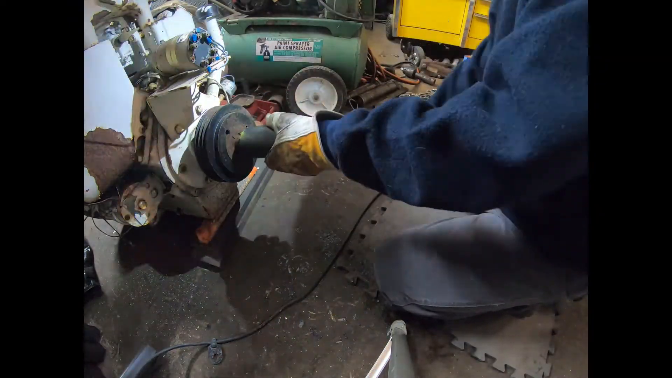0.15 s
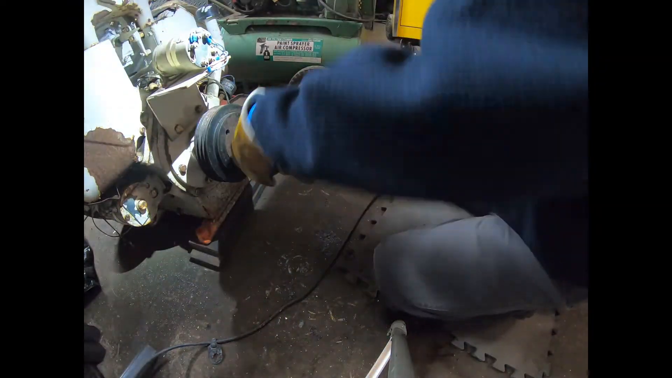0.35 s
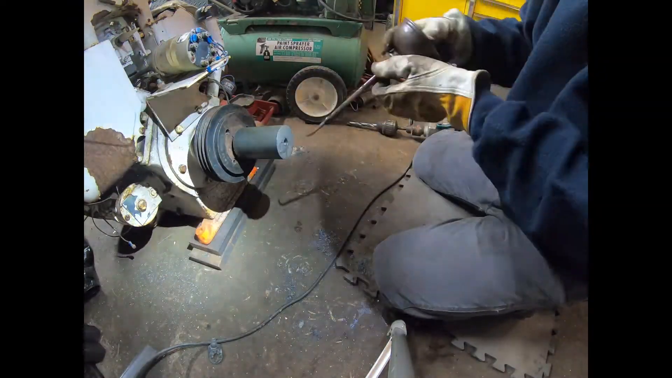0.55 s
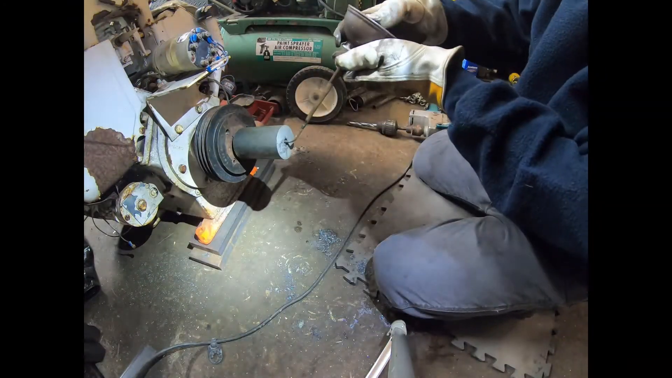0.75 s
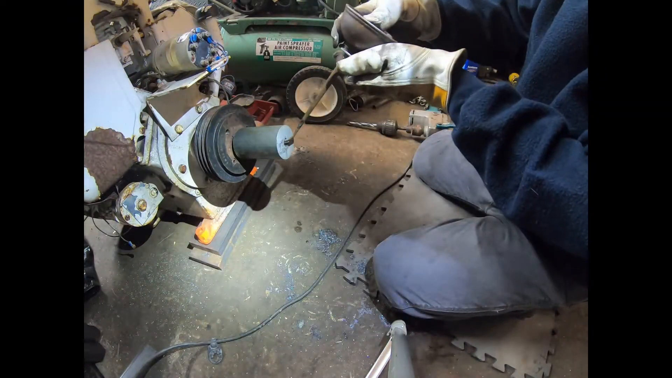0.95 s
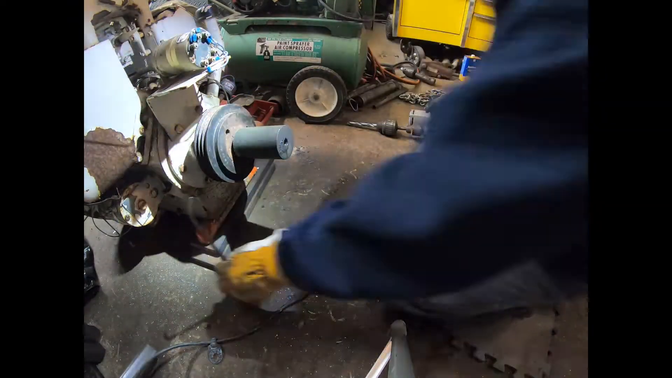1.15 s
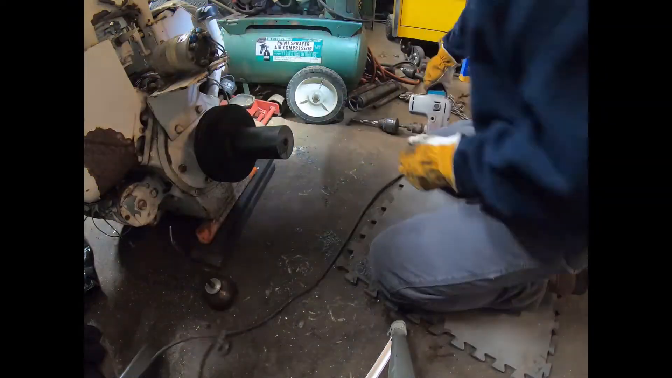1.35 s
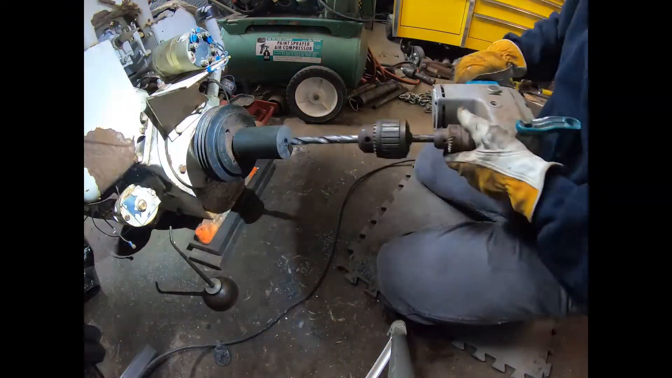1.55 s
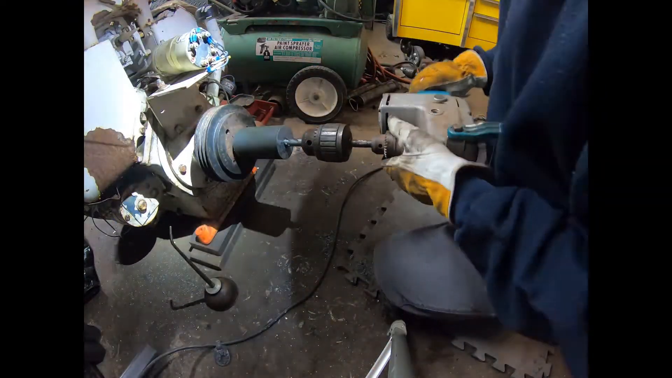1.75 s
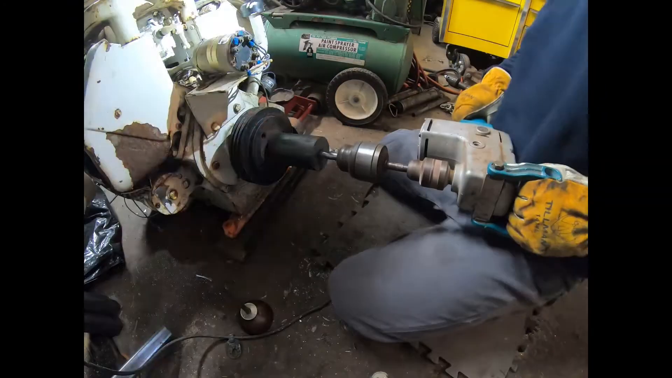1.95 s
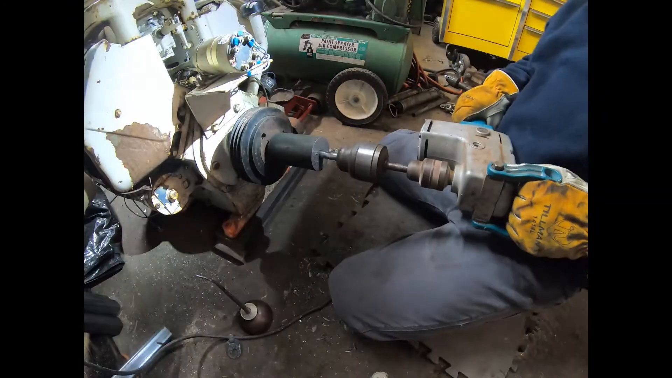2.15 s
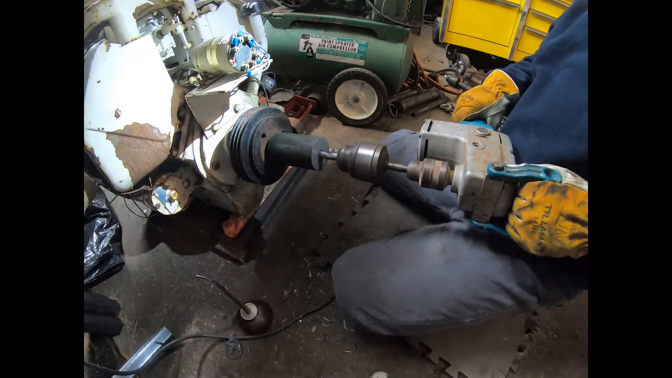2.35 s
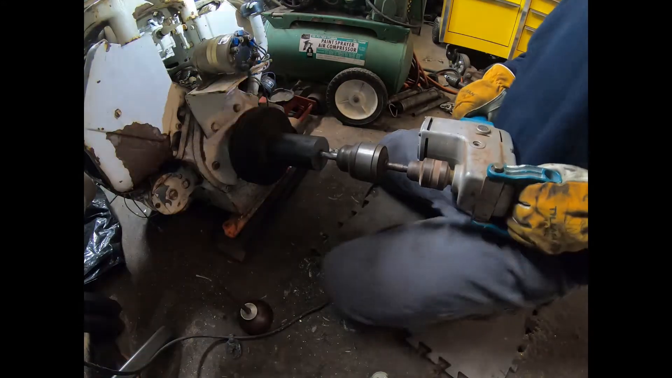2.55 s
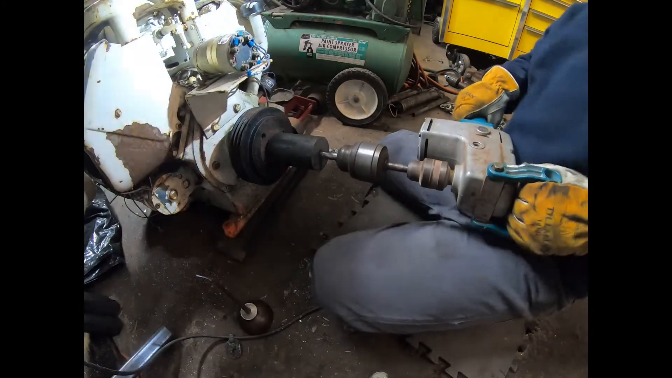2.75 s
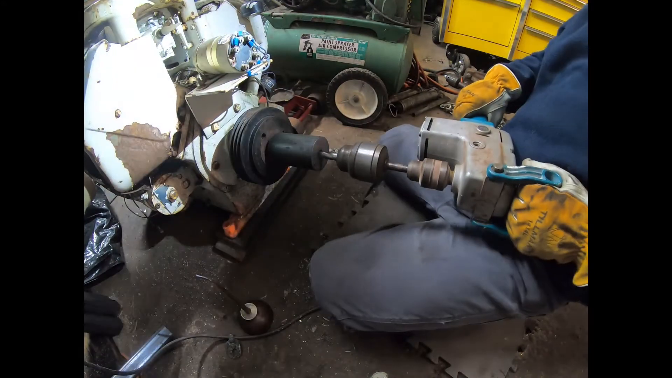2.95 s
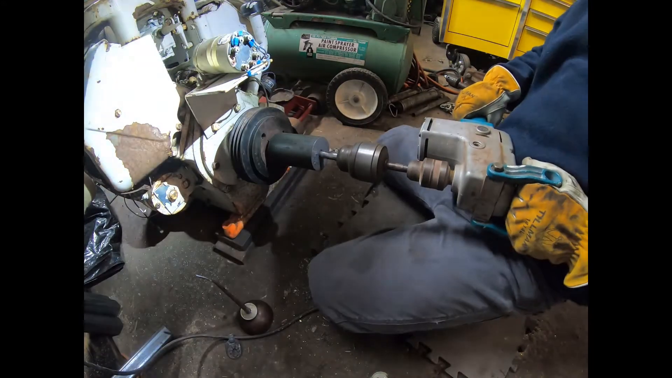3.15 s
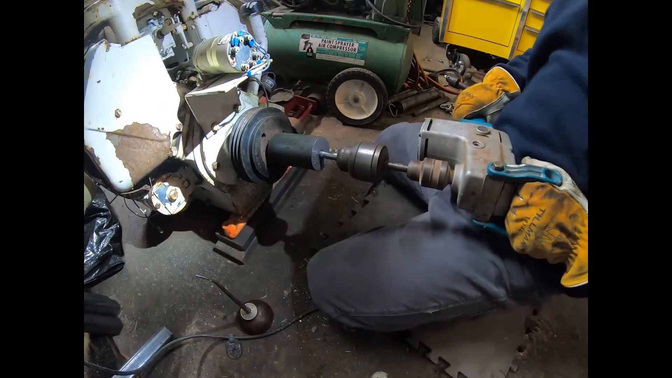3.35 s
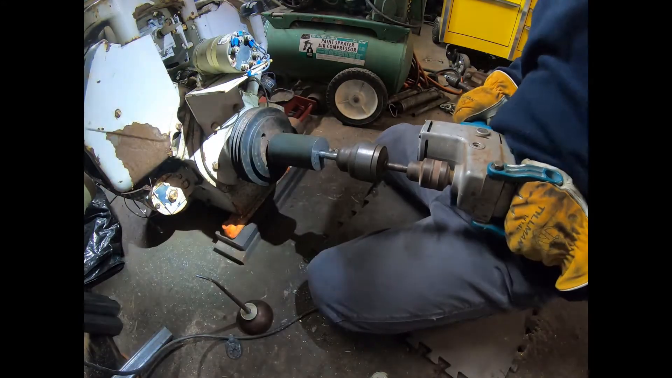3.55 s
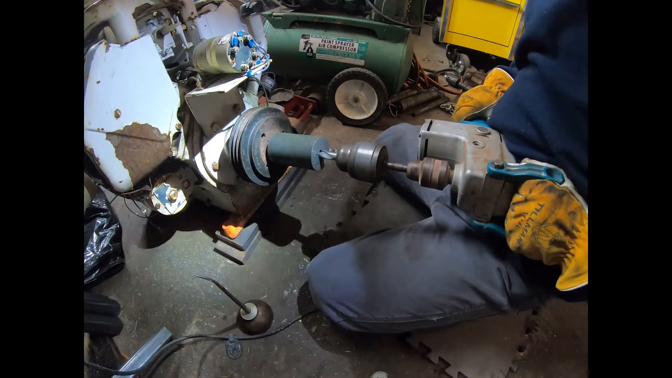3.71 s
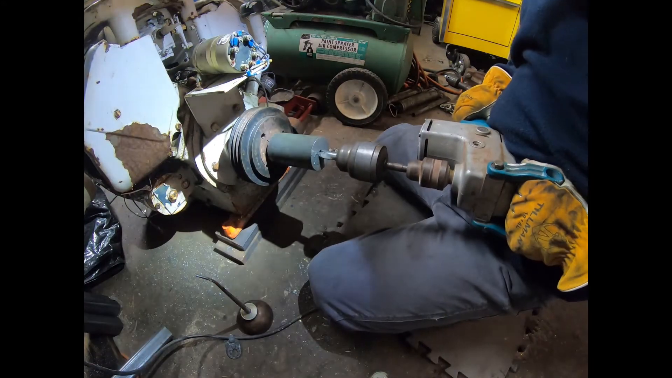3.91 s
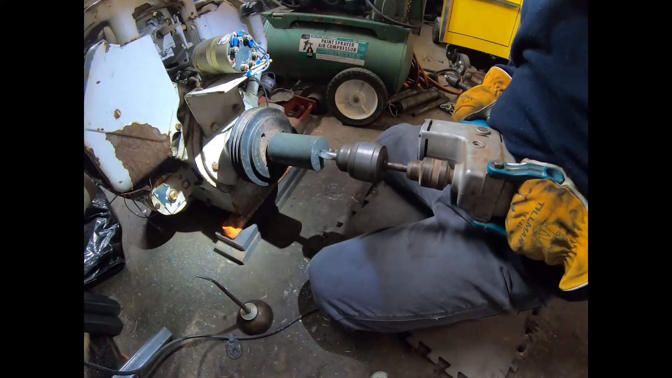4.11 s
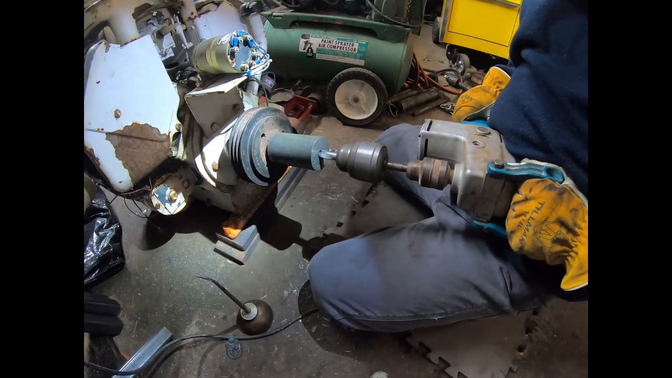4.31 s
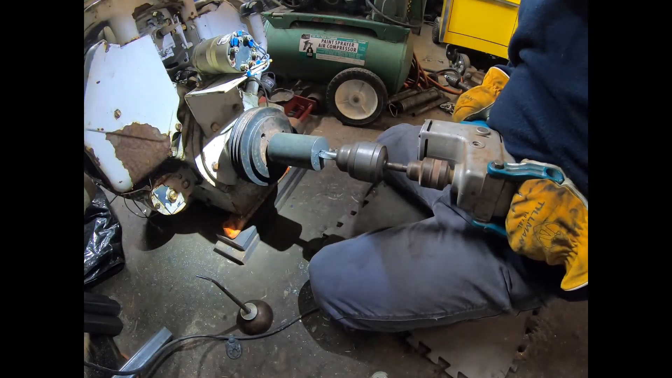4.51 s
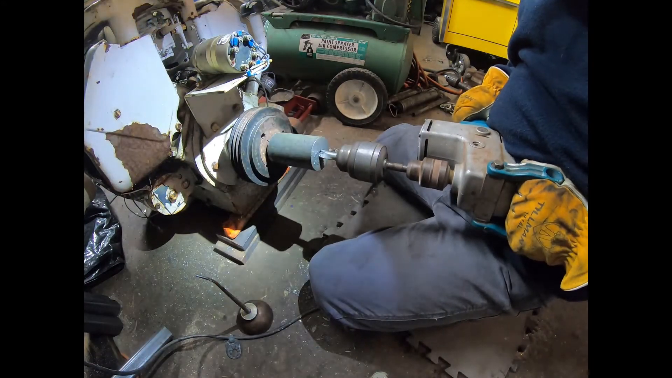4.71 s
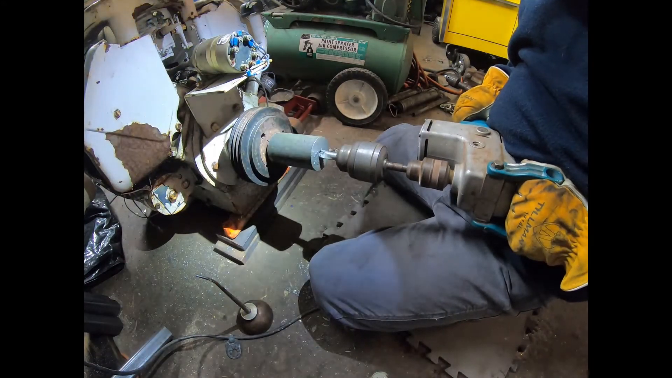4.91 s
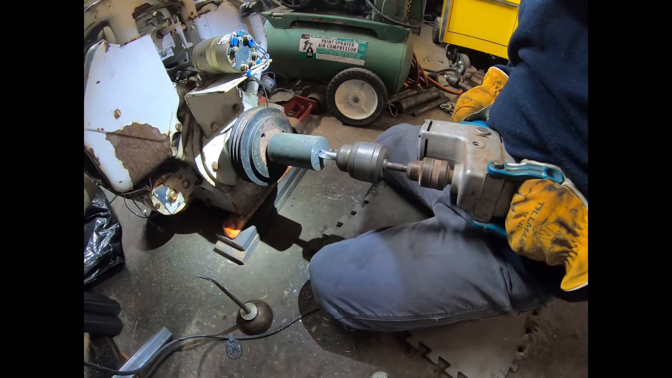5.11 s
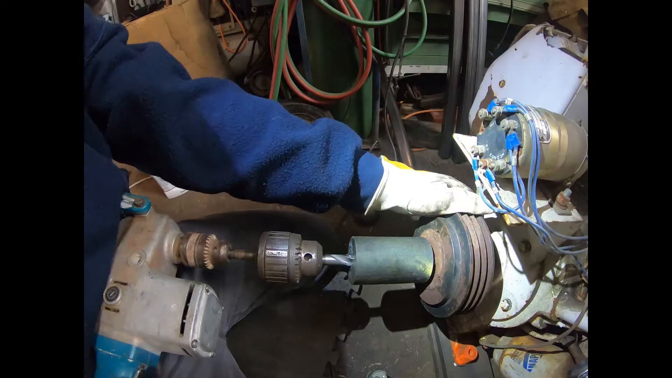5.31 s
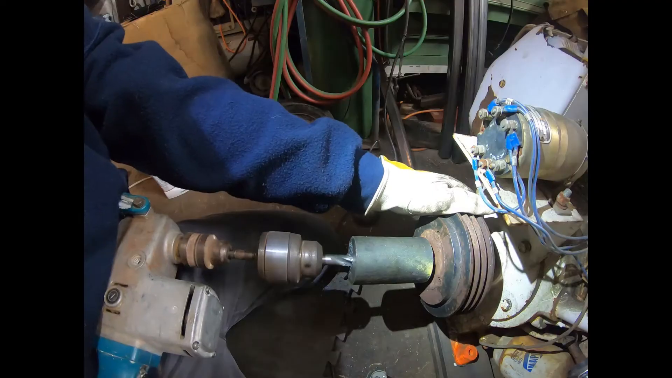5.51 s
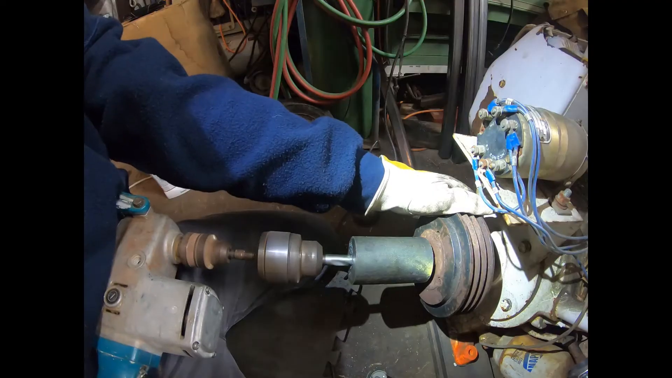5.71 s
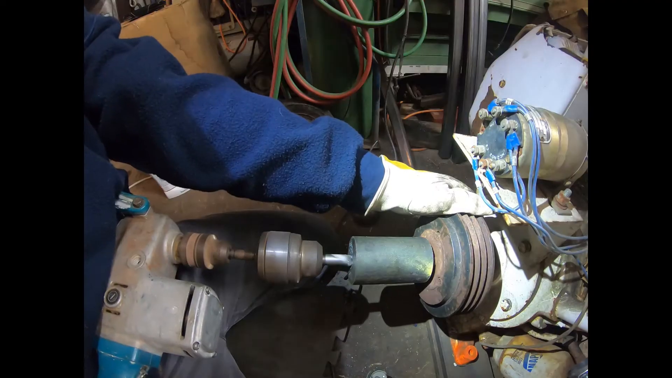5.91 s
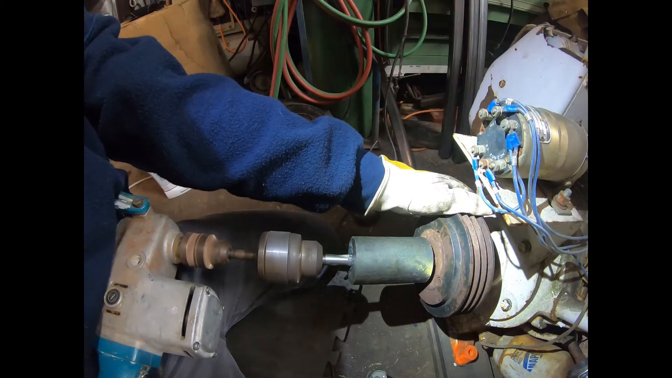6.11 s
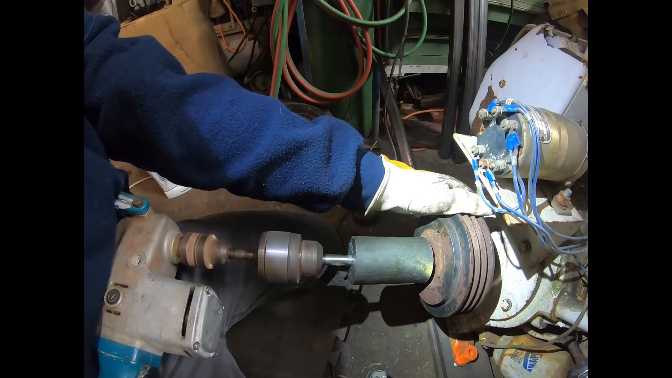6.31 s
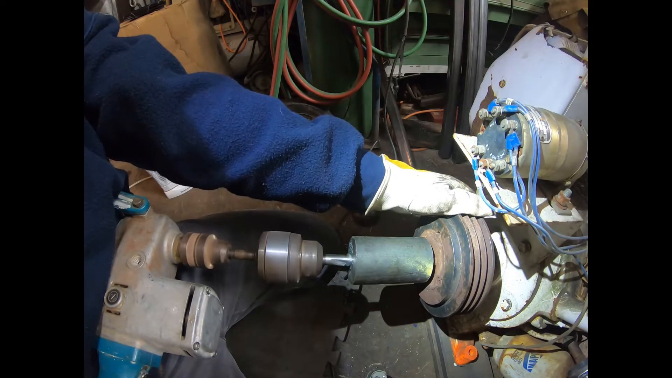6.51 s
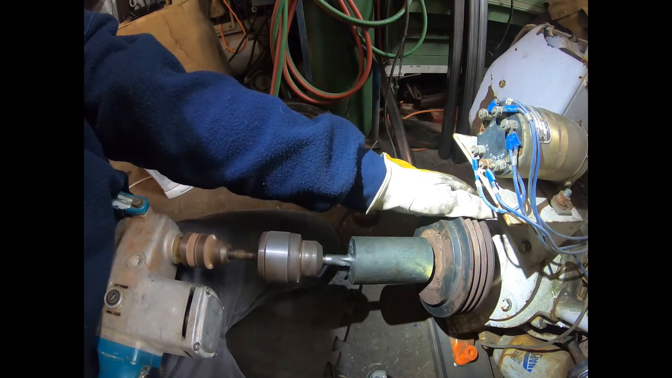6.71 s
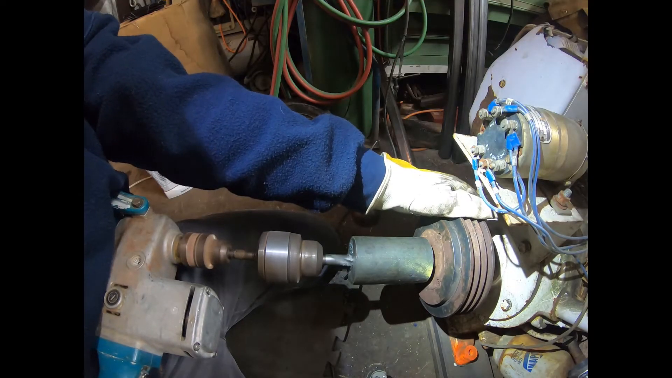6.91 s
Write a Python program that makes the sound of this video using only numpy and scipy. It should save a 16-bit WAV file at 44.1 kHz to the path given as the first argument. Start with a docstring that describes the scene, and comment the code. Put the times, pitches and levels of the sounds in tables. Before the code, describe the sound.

A quiet workshop hisses with thin electric tones. From 0.1 to 0.5 s come dull thuds, light metal clinks and cracks of an oil can. At about 0.8 to 1.05 s it spits nine quickening pops and bright snaps. Clinks follow around 1.25 s, a crack at 1.5, cloth brushes and a knock near 1.77. At 1.9 s a big corded drill is heard close at full speed: broad fan rush, rough gears, a whine near 4.6 kHz and uneven low air buffeting, with brief chip squeaks until 3.3. A heavy thud at 3.7 precedes a slightly lower, stronger, steadier whine. It cuts at 5.37; dull hum remains. At 5.5, with clinks, the motor restarts from another side, growling then climbing, vents hissing to the right. Very high squeals pierce at 5.6, 6.44 and from 6.76 to the end, just past 7 s, momentarily ducking everything.

```python
"""Hiss and thin electric tones of a quiet workshop, knocks of a pump oil can, then its quickening sputter.
A big corded drill bores a steel shaft: filtered-noise fan rush and exhaust buffeting, ringing gears, sine whine.
After a short stop it spins up, heard from the other side; gliding sines squeal as the bit sticks and slips.
Gain control ducks everything under piercing treble."""
import sys
import numpy as np
from scipy import signal
from scipy.fft import rfft, irfft, next_fast_len
from scipy.io import wavfile
from scipy.ndimage import uniform_filter1d

SR = 44100
rng = np.random.default_rng(int(sys.argv[2]) if len(sys.argv) > 2 else 0)


def dump_mix(stems):
    """Bounce the given channels to the path in sys.argv[1] as a 16-bit WAV at rate SR."""
    frames = np.atleast_2d(stems).T  # one column per channel
    limited = np.clip(frames, -1, 1)  # hard clip at full scale
    pcm = np.round(limited * 32767).astype(np.int16)
    wavfile.write(sys.argv[1], SR, pcm)


N = 311346
TIME_S = np.arange(N) / SR

# Noise spectra, relative: (frequency [Hz], density [dB per Hz])
ROOM_HISS = [(30, -24), (110, -17), (400, -19), (850, -18), (1300, 1), (1900, -1.5), (2500, -4.5),
             (3200, -4), (4300, -5), (6500, -9), (9500, -4.5), (13000, -7), (16000, -9.5)]
WIDE_HISS = [(60, -26), (300, 9), (1500, -10), (9000, 4.5), (11500, -16), (15000, -28)]
IDLE_HUM = [(29, -55), (50, -16), (93, -24), (207, -14), (484, -14.5), (1420, -26), (2150, -25.5),
            (12000, -56), (15600, -104), (22000, -120)]
CRACK = [(100, -13), (900, -7), (4000, 9.5), (8000, 6), (11000, 1), (16000, -4)]
CLOTH = [(100, -29), (450, -4), (900, 3.5), (2500, 0), (6000, -6), (16000, -4.5)]
BUFFET = [(15, -3), (40, -0.5), (100, 2), (160, -5), (230, -11.5), (350, -25.5), (600, -32), (1300, -75)]
RUSH_FRONT = [(200, -11.5), (600, -12.5), (1100, -4.5), (1600, -3), (2450, -0.5), (3200, 1.5), (4000, -4),
              (4700, -4.5), (5500, -18.5), (7200, -17), (9300, -25), (10200, -33.5), (12700, -42.5),
              (14000, -70)]
RUSH_BEHIND = [(20, -19), (110, -7.5), (300, -5.5), (750, -3.5), (1500, 0), (2700, 3), (4600, 1),
               (7500, -8), (9600, -11.5), (10500, -26), (13000, -28), (15500, -43)]
VENT_HISS = [(1000, -28), (4400, -12.5), (5600, -1.5), (6500, 3.5), (7500, -1), (8800, -15.5),
             (10500, -23.5), (15000, -51)]
# Left-right correlation of stereo noise: (frequency [Hz], correlation [-1..1])
STEREO_LIKENESS = [(60, 0.34), (290, 0.97), (700, 0.65), (1400, 0.66), (3100, 0.84), (6800, 0.13),
                   (15000, 0.034)]

# Resonances: (frequency [Hz], width [Hz], gain [dB])
THUD_MODES = [(560, 100, 8), (734, 130, 6), (916, 44, -27), (980, 190, -1.5), (1340, 92, -3)]
POP_MODES = [(1110, 350, -7.5), (2260, 1700, 2.5), (3876, 440, 2), (7500, 4100, -1.5)]
SNAP_MODES = [(4220, 490, -6), (9200, 6640, -9.5), (12100, 330, 4), (14900, 7300, -12)]
LOW_GEAR_MODES = [(931, 45, -5), (1154, 35, -6), (1372, 55, 0), (1461, 40, -2)]
HIGH_GEAR_MODES = [(1724, 40, 0), (1830, 90, 0), (2007, 120, 0), (3020, 90, 0), (3487, 60, -2)]
HIGH_HISS_MODES = [(10880, 35, 17), (13400, 130, -7)]
HOUSING_MODES = [(760, 81, 0), (1343, 57, 6), (1475, 63, 2), (2140, 49, 2), (3030, 33, -7), (3260, 85, 4.5),
                 (3860, 20, -33)]
VENT_MODES = [(5750, 60, 5), (6520, 44, -1), (6400, 80, -8), (6850, 53, -7)]

# Thin electric whine in the shop: (frequency [Hz], level [dB])
SHOP_TONES = [(1583, -51.5), (2880, -61.5), (3165, -59.5), (6325, -71), (9491, -58.5), (11068, -72)]
# Knocks of can and drill, part levels before each part's own gain:
# (time [s], thud [dB], clink [dB], clink pitch [Hz], crack [dB], clink t60 [s])
KNOCKS = [(0.092, -36, -70, 3800, -77.5, 0.19), (0.215, -63, -21.5, 3800, -25, 0.053),
          (0.259, -33.5, -70, 3800, -60, 0.16), (0.2885, -28.5, -44, 4000, -41.5, 0.15),
          (0.366, -48, -35, 4440, -28, 0.06), (0.501, -39, -42, 4680, -26.5, 0.069),
          (1.236, -66, -21.5, 4260, -32.5, 0.046), (1.262, -60, -18.5, 4250, -33, 0.022),
          (1.272, -65, -24, 4350, -30, 0.041), (1.505, -58, -55, 4370, -28.5, .015),
          (1.769, -24.5, -47, 4000, -21, 0.09), (3.735, -11.5, -49, 3820, -40, 0.035),
          (5.505, -37, -34, 3210, -33, 0.052), (5.574, -32, -24, 2900, -36, 0.037)]
# Sleeves and gloves brushing: (time [s], level [dB], half length [s])
BRUSHES = [(1.389, -34.5, 0.014), (1.66, -40, 0.019), (1.73, -41, 0.039)]
# Uneven levels of wind and gear noise, partly random, used relative to column means:
# (time [s], exhaust buffeting [dB], low gear band [dB], high gear band [dB])
BORING_LEVELS = [(1.97, -23, -27, -23.5), (2.01, -22, -29, -24), (2.54, -18, -28, -24),
                 (2.9, -21, -30, -24.5), (3.29, -18, -29, -24), (3.83, -22, -27.5, -24),
                 (4.17, -20, -30.5, -27.5), (4.3, -20.5, -32.5, -25), (4.34, -29.5, -29.5, -26.5),
                 (4.41, -17, -32, -28), (4.49, -25, -31, -25), (4.54, -20, -29, -24),
                 (4.65, -21, -29.5, -25), (5.28, -25.5, -26, -27), (5.32, -25.5, -27, -29)]
# Momentary fades of the whine: (time [s], depth [dB], half length [s])
WHINE_FADES = [(2.14, 4.5, .025), (2.3, 2.5, .1), (2.52, 15, 0.036), (2.72, 9, .03), (3.19, 10.5, 0.096),
               (3.58, 5.5, 0.25)]
# Squeaks of chips curling off the edge: (time [s], mid pitch [Hz], level [dB], half length [s])
CHIPS = [(2.042, 3630, -22, .006), (2.245, 3540, -23, .006), (2.75, 3030, -23, .006),
         (2.85, 3420, -25, .005), (2.95, 3100, -24, .007), (3.33, 3690, -22, .009)]
# Blade tone let out by the housing: (frequency [Hz], level [dB])
WHINE_RESPONSE = [(1900, -35), (2890, -34), (3030, -20.5), (3450, -27), (3800, -24.5), (4150, -31),
                  (4280, -22.5), (4490, -26)]
# Squeals of the bit:
# (time [s], length [s], end level [dB], held pitch [Hz], catch bend [Hz], release bend [Hz])
SQUEALS = [(5.603, 0.021, -27, 8860, -150, 152), (6.441, 0.019, -23, 9300, 150, -150),
           (6.758, 0.043, -10, 8890, -100, 700), (6.859, 0.029, -20.5, 9130, 450, -200),
           (6.891, 0.12, -9.5, 8850, 650.5, 250), (7, 0.047, -21, 9200, -200, 150)]

# Oil can: one quickening run of pops and snaps
SPUTTER_START_S, SPUTTER_PERIOD_S, QUICKEN_S = .8058, .0298, .00016
POP_LEAD_S, STUMBLE_S = .0146, .0048
POP_DB, FIRST_POP_DB, SNAP_DB, SPUTTER_SPREAD_DB = -6, -13.5, -6.5, .5

# Boring: mean levels, gear growl in dB per dB of its band
BORE_START_S, BORE_STOP_S = 1.91, 5.372
BUFFET_DB, LOW_GEAR_DB, HIGH_GEAR_DB, GEAR_SWING = -22, -32.5, -25.5, 1.55
RUSH_DB = -21
# The bit bites deeper: the motor sags, the whine rises and steadies
BITE_S, BITE_TAKES_S = 3.83, 0.27
LIGHT_CUT_HZ, DEEP_CUT_HZ = 4654, 4605
WHINE_DB, BITE_WHINE_RISE_DB = -24.5, 3.5
FLUTTER_DB, FLUTTER_RATE_HZ = -37, 19
CHIP_GLIDE_HZ_PER_S = 5000

# Spin-up: a quick surge, then a slow creep to the top blade rate
SURGE_START_S, SURGE_S, CREEP_S, SURGE_SHARE = 5.464, .144, .454, .53
TOP_BLADE_HZ = 4550
# Levels at top speed; change at full strain
BEHIND_RUSH_DB, STRAIN_RUSH_DB = -24, 4
VENT_DB, STRAIN_VENT_DB = -27.5, -24
VENT_RING_RE_HISS_DB = -14.5
RESTART_S, RESTART_EDGE_S = 5.503, 0.0027
AIR_START_DB, AIR_ATTACK_S = -19.5, 0.077

BEND_S, SQUEAL_EDGE_S = .0055, 0.0053
SQUEAL_GROWTH_DB_PER_S = 86
SQUEAL_WOBBLE = .002   # share of the pitch

# Gain control and top cut
SENSE_HZ, KNEE_DB, SQUEEZE, SENSE_S = 8800, -22.5, 0.52, 0.014
RELEASE_DB_PER_S = 61
CUTOFF_HZ = 16900


def from_db(db):
    """Decibels to gain."""
    return 10 ** (np.asarray(db) / 20)


def rms_one(x):
    """Scale to rms 1."""
    return x / np.sqrt(np.mean(x ** 2) + 1e-20)


def in_time(rows):
    """Each column of a curve, at every sample."""
    s, *columns = np.transpose(rows)
    return [np.interp(TIME_S, s, c) for c in columns]


def at_hz(points, hz):
    """Read a table on a log-frequency axis."""
    f, value = np.transpose(points)
    return np.interp(np.log(np.maximum(hz, 1)), np.log(f), value)


def between(start_s, stop_s, fade_s):
    """1 from start to stop, with smooth edges inside."""
    edge_s = np.minimum(TIME_S - start_s, stop_s - TIME_S)
    return np.sin(np.pi / 2 * np.clip(edge_s / fade_s, 0, 1)) ** 2


def bump(at_s, half_s):
    """Bell-shaped swell of height 1."""
    return np.exp(-.5 * ((TIME_S - at_s) / half_s) ** 2)


def pan(right_db):
    """Left and right gains, right_db apart."""
    return from_db(np.array([[-.5], [.5]]) * right_db)


def drift(rate_hz):
    """Slow random wander, rms 1, computed every 20 samples."""
    r = np.exp(-40 * np.pi * rate_hz / SR)
    kicks = rng.standard_normal(N // 20 + 2002)
    slow = signal.lfilter([1], [1, -2 * r, r * r], kicks)[2000:]   # settled part
    return np.interp(np.arange(N) / 20, np.arange(len(slow)), rms_one(slow))


def noise(spectrum, stereo=False):
    """Coloured noise, rms 1; stereo sides are partly alike."""
    size = next_fast_len(N)
    hz = np.arange(size // 2 + 1) * SR / size
    mid, side = rfft(rng.standard_normal((2, size))) * from_db(at_hz(spectrum, hz))
    if stereo:
        alike = np.clip(at_hz(STEREO_LIKENESS, hz), -1, 1)
        mid = np.sqrt(1 + alike) * mid + np.sqrt(1 - alike) * side * [[1], [-1]]
    return rms_one(irfft(mid, size)[..., :N])


def resonate(x, modes):
    """Parallel two-pole resonances, each with its own peak gain."""
    out = 0
    for hz, width_hz, db in modes:
        r = np.exp(-np.pi * width_hz / SR)
        poles = [1, -2 * r * np.cos(2 * np.pi * hz / SR), r * r]
        peak_gain = from_db(db) * (1 - r * r) / 2
        out = out + peak_gain * signal.lfilter([1, 0, -1], poles, x + 1e-18)
    return out


def ringing(modes):
    """Resonances driven by band-limited noise, dark outside their own range; rms 1."""
    hz = np.array(modes)[:, 0]
    edges_hz = [hz.min() * 3 / 4, min(hz.max() * 4 / 3, SR * .4)]
    band = signal.butter(2, edges_hz, "band", fs=SR, output="sos")
    drive = signal.sosfilt(band, rng.standard_normal(N))
    return rms_one(resonate(drive, modes))


def tone(hz):
    """Gliding sine, rms 1, random phase."""
    return np.sqrt(2) * np.sin(2 * np.pi * (np.cumsum(hz * np.ones(N)) / SR + rng.random()))


def decays(times_s, levels_db, t60s_s, rise_s):
    """Envelope of blows that swell quickly and die away."""
    out = np.zeros(N)
    age = TIME_S[:SR // 2]
    for s, db, t60 in zip(times_s, levels_db, t60s_s):
        at = int(s * SR)
        out[at:at + len(age)] += from_db(db - 60 * age / t60) * (1 - np.exp(-age / rise_s))
    return out


def clutter(x, echo_db, spread_s, count=24):
    """Floor, machine and kneeling body throw back many near echoes, which ripple the spectrum."""
    out = x.copy()
    for late, size in zip(rng.random(count), rms_one(rng.standard_normal(count))):
        lag = int((.002 + late * spread_s) * SR)
        out[..., lag:] += from_db(echo_db) * size / np.sqrt(count) * x[..., :N - lag]
    return out / np.sqrt(1 + from_db(echo_db) ** 2)


def workshop():
    """Hiss and thin electric tones before the work; a dull hum in the pause."""
    tones = sum(from_db(db) * tone(hz * (1 + 0.00053 * drift(7.4))) for hz, db in SHOP_TONES)
    diffuse = from_db(-62) * np.array([noise(WIDE_HISS), noise(WIDE_HISS)])
    before = (from_db(-43.5) * noise(ROOM_HISS, stereo=True) + tones + diffuse) * pan(right_db=3.0)
    pause = from_db(-48) * noise(IDLE_HUM, stereo=True) + from_db(-48.5) * tone(200)
    return before * between(-1, 1.915, fade_s=0.046) + pause * between(5.385, 5.65, fade_s=0.035)


def handling():
    """Knocks: hollow thud (resonated noise), metal clink (sine), crack (noise); cloth brushes between."""
    s, thud_db, clink_db, clink_hz, crack_db, t60 = np.transpose(KNOCKS)
    rattle = decays(s, thud_db, t60 / 2, rise_s=0.0025) * noise(CLOTH, stereo=True)
    hollow = signal.butter(2, [380, 1500], "band", fs=SR, output="sos")
    thuds = from_db(13.0) * signal.sosfilt(hollow, resonate(rattle, THUD_MODES))

    pitch_hz = clink_hz[np.maximum(np.searchsorted(s, TIME_S) - 1, 0)]   # latest knock's pitch
    sides = np.array([tone(pitch_hz * (1 + 0.032 * drift(202))) for side in range(2)])
    clinks = decays(s, clink_db, t60, rise_s=0.00037) * sides

    contact = decays(s, crack_db + 7.5, t60 / 10, rise_s=.0001)   # first touch is sharpest
    tail = decays(s, crack_db + 0.5, t60, rise_s=0.0016)
    cracks = (contact + tail) * noise(CRACK, stereo=True)

    brushing = sum(from_db(db) * bump(at, half) for at, db, half in BRUSHES)
    return (thuds + clinks + cracks + brushing * noise(CLOTH, stereo=True)) * pan(right_db=1.5)


def spits(events, modes, width_s, tail_db, tail_t60_s):
    """Sharp pulses ring briefly in the spout, each followed by a fine noise spatter."""
    s, db = np.transpose(events)
    clicks = np.zeros(N)
    clicks[(s * SR).astype(int)] = from_db(db)

    shared = rms_one(rng.standard_normal(N) * from_db(3.5 * drift(460)))
    droplets = shared + .35 * rng.standard_normal((2, N))
    spatter = decays(s, db + tail_db, np.full(len(s), tail_t60_s), rise_s=0.0009) * droplets

    pulse = signal.windows.gaussian(33, width_s * SR)
    height = np.abs(resonate(np.pad(pulse, (0, SR // 10)), modes)).max()
    rung = resonate(clicks + spatter, modes)
    sound = signal.fftconvolve(rung, pulse[None], mode="same") / height
    no_bass = signal.butter(4, 600, "high", fs=SR, output="sos")   # so small a spout gives none
    return signal.sosfilt(no_bass, sound)


def oil_can(count=9):
    """Air and oil leave the spout in turns: round pop, bright snap; the first two pops stumble."""
    k = np.arange(count)
    snap_s = SPUTTER_START_S + k * (SPUTTER_PERIOD_S - QUICKEN_S * k)
    pop_s = snap_s - POP_LEAD_S - STUMBLE_S * (-1) ** k * (k < 2)
    pop_db, snap_db = SPUTTER_SPREAD_DB * rng.standard_normal((count, 2)).T
    pop_db = pop_db + np.where(k == 0, FIRST_POP_DB, POP_DB)
    snap_db = snap_db + SNAP_DB
    pops = spits(np.c_[pop_s, pop_db], POP_MODES, width_s=.00003, tail_db=-31.0, tail_t60_s=0.094)
    snaps = spits(np.c_[snap_s, snap_db], SNAP_MODES, width_s=.000006, tail_db=-26, tail_t60_s=0.04)
    return pops + snaps


def boring():
    """Drill at full speed, close: fan rush, gear growl, blade whine and lumpy exhaust wind."""
    buffet_db, low_db, high_db = in_time(BORING_LEVELS) - np.mean(BORING_LEVELS, axis=0)[1:, None]
    bite = between(BITE_S, np.inf, fade_s=BITE_TAKES_S)
    blade_hz = (LIGHT_CUT_HZ + (DEEP_CUT_HZ - LIGHT_CUT_HZ) * bite) * (1 + .0007 * drift(12))

    rush = from_db(RUSH_DB + 0.69 * drift(60)) * noise(RUSH_FRONT)
    low_gear = from_db(LOW_GEAR_DB + GEAR_SWING * low_db) * ringing(LOW_GEAR_MODES)
    high_gear = from_db(HIGH_GEAR_DB + GEAR_SWING * high_db) * ringing(HIGH_GEAR_MODES)
    around = from_db(-58.0) * noise(WIDE_HISS) * [[1], [-1]]
    roar = clutter(rush, echo_db=-9.5, spread_s=.02) + low_gear + high_gear + around

    fade_db = sum(db * bump(at, half) for at, db, half in WHINE_FADES)
    whine_db = WHINE_DB + BITE_WHINE_RISE_DB * bite - fade_db
    flutter = from_db(FLUTTER_DB) * drift(FLUTTER_RATE_HZ)
    whine = (from_db(whine_db) + flutter) * tone(blade_hz)
    commutator = from_db(-50.5 + 2.3 * drift(33)) * tone(2 * blade_hz)   # twice as many bars as blades

    # narrow high hiss near 10.9 and 13.4 kHz, fading in
    high_hiss = from_db(-53.5 + 4.4 * drift(7.7)) * ringing(HIGH_HISS_MODES)
    high_hiss = high_hiss * between(3.9, 5.8, fade_s=0.89)

    gust = drift(32)
    eddy_noise = noise([(100, -8), (280, 7.5), (500, -5.5), (1200, -41)])
    eddies = from_db(-25.5 + 10.7 * np.minimum(gust, 2)) * eddy_noise   # strong gusts reach higher
    wind = from_db(BUFFET_DB + buffet_db) * (from_db(2.5 * gust) * noise(BUFFET) + eddies)
    heard = between(BORE_START_S, BORE_STOP_S, fade_s=0.042)
    return (roar + whine + commutator + high_hiss + wind) * heard


def chips():
    """Short squeaks from the hole, rising as each chip tightens."""
    out = 0
    for at_s, hz, db, half_s in CHIPS:
        pitch_hz = hz * (1 + 0.0039 * drift(110)) + CHIP_GLIDE_HZ_PER_S * (TIME_S - at_s)
        out = out + from_db(db) * bump(at_s, half_s) * tone(pitch_hz)
    return out


def spin_up(blades=12):
    """Motor gathers speed as strain decays: blade and commutator tones climb, vents hiss to the right."""
    age = np.maximum(TIME_S - SURGE_START_S, 0)
    # the current falls as the speed rises
    strain = SURGE_SHARE * np.exp(-age / SURGE_S) + (1 - SURGE_SHARE) * np.exp(-age / CREEP_S)
    blade_hz = TOP_BLADE_HZ * (1 - strain) * (1 + 0.00098 * drift(28))

    rush_db = BEHIND_RUSH_DB + STRAIN_RUSH_DB * strain + .5 * drift(36)
    rush = from_db(rush_db) * noise(RUSH_BEHIND, stereo=True)
    slots = noise(VENT_HISS, stereo=True) + from_db(VENT_RING_RE_HISS_DB) * ringing(VENT_MODES)
    vents = from_db(VENT_DB + STRAIN_VENT_DB * strain ** 2) * slots * pan(right_db=14.5)
    housing = from_db(rush_db - 11.0) * ringing(HOUSING_MODES) * pan(right_db=12.5)
    growl_spectrum = [(40, -18), (120, 2.5), (400, 0), (750, 5), (1300, -8), (4000, -45)]
    growl = from_db(rush_db + 1.0) * strain * noise(growl_spectrum, stereo=True)
    roar = clutter(rush + vents + housing + growl, echo_db=-14, spread_s=.025)

    whine = from_db(at_hz(WHINE_RESPONSE, blade_hz) + 1.74 * drift(24)) * tone(blade_hz)
    commutator_hz = 2 * blade_hz * (1 + .02 * strain * drift(200))
    commutator = from_db(-42 + 24 * strain + 1.5 * drift(25)) * tone(commutator_hz) * pan(right_db=5)
    unbalance = from_db(-30 + 2 * drift(15)) * strain * tone(blade_hz / blades)   # once per turn
    high_hiss = from_db(-50.0 + 1.8 * drift(6.4)) * ringing(HIGH_HISS_MODES)
    tones_and_hiss = (whine + commutator + unbalance + high_hiss) * between(5.56, np.inf, fade_s=.05)

    attack_db = AIR_START_DB * np.clip(1 - (TIME_S - RESTART_S) / AIR_ATTACK_S, 0, 1)
    air = roar * from_db(attack_db) * between(RESTART_S, np.inf, fade_s=RESTART_EDGE_S)
    return air + tones_and_hiss


def squeals():
    """Edge sticks and slips: sines bend onto pitch, build up and bend away; a faint 15 kHz tone follows."""
    shriek = strength = 0
    for s, length, db, hz, catch_hz, release_hz in SQUEALS:
        age = np.clip(TIME_S - s, 0, length)
        catch = catch_hz * np.exp(-age / BEND_S)
        release = release_hz * np.exp((age - length) / BEND_S)
        pitch_hz = hz + catch + release
        level_db = db - SQUEAL_GROWTH_DB_PER_S * (length - age) + 1.2 * drift(80)
        grip = from_db(level_db) * between(s, s + length, fade_s=SQUEAL_EDGE_S)
        shriek = shriek + grip * tone(pitch_hz * (1 + SQUEAL_WOBBLE * drift(145)))
        strength = strength + grip
    # not from the bit, but as strong as the squeals are, 29 dB down
    recorder_tone = from_db(-29) * strength * tone(15000 * (1 + .01 * drift(15)))
    return (shriek + recorder_tone) * pan(right_db=7.5)


def scene():
    """Oiling, boring, and boring again."""
    return workshop() + handling() + oil_can() + boring() + chips() + spin_up() + squeals()


def record(dry):
    """Gain control ducks all under piercing treble and lets it back up; the top is cut steeply."""
    sense = [(SENSE_HZ, 2000, 0)]
    treble = resonate(resonate(dry, sense), sense)
    power = uniform_filter1d(np.mean(treble ** 2, axis=0), int(SENSE_S * SR))
    duck_db = SQUEEZE * 10 * np.log10(1 + power / from_db(KNEE_DB) ** 2)
    release_db = RELEASE_DB_PER_S * TIME_S
    duck_db = np.maximum.accumulate(duck_db + release_db) - release_db   # falls no faster than release
    top_cut = signal.cheby2(16, 70, CUTOFF_HZ, fs=SR, output="sos")
    return signal.sosfilt(top_cut, from_db(-duck_db) * dry)


dry = scene()
out = record(dry)
dump_mix(out)
```